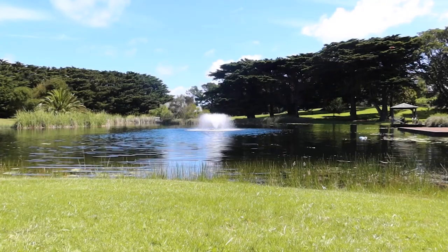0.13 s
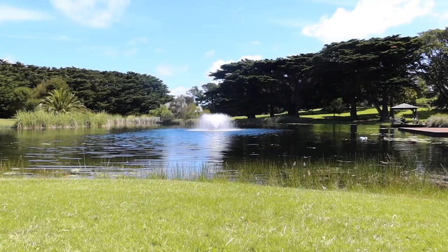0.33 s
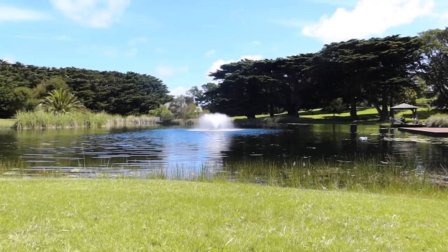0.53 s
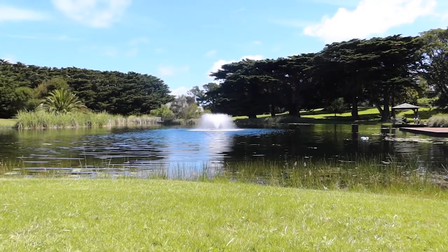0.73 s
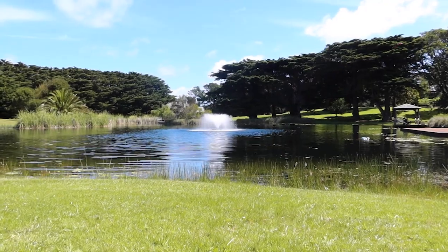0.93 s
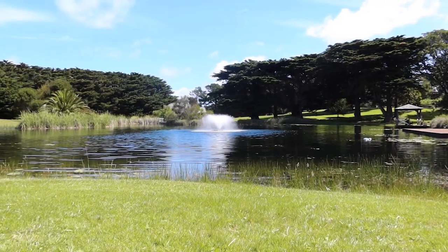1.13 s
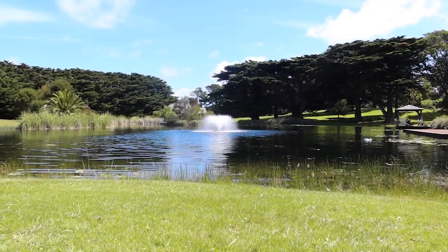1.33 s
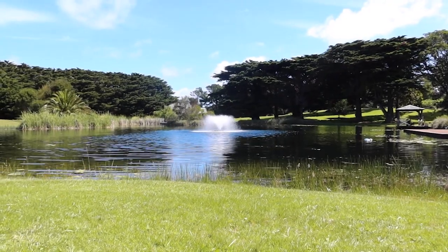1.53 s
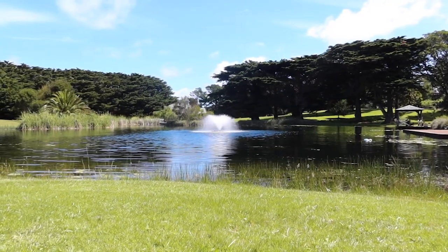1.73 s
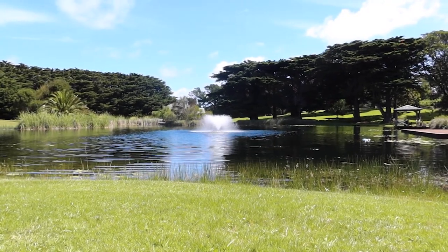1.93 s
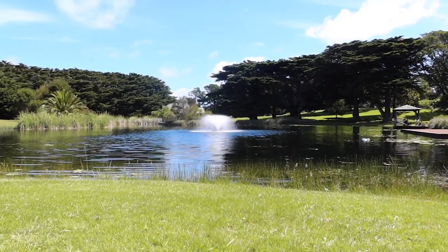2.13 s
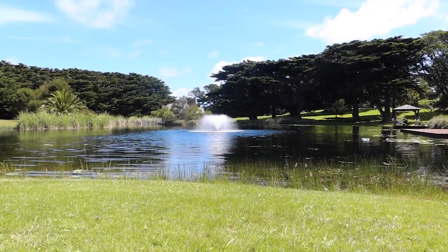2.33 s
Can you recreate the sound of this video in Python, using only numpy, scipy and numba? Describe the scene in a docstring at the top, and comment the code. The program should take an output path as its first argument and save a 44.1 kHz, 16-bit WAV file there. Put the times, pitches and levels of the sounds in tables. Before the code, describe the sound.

A fountain splashes steadily into a pond, with a faint motor hum underneath.

```python
"""Fountain in a park pond

Heard from the bank, the spray falls back as thousands of drop impacts and tiny ringing bubbles a second,
with a few heavier plops and a fine hiss of mist on top. A motor, probably the pump, hums underneath.
A light breeze buffets the mono microphone, mostly in the first half second."""
import sys
import numpy as np
from scipy import signal
from scipy.fft import rfft, irfft, next_fast_len
from scipy.io import wavfile
from numba import njit

SR = 44100
rng = np.random.default_rng(int(sys.argv[2]) if len(sys.argv) > 2 else 0)


def materialize(psi):
    """Save the field psi as 16-bit PCM at rate SR to the path in sys.argv[1].

    A 1-D psi becomes a single channel; in a 2-D psi each row is a channel.
    """
    bounded = np.clip(np.atleast_2d(psi).T, -1, 1)
    quanta = np.round(bounded * 32767).astype(np.int16)
    wavfile.write(sys.argv[1], SR, quanta)


N = 108927

# tone colour of the falling water (frequency [Hz], gain [dB])
SPLASH_EQ = [(210, -34.5), (350, -8), (423, -10), (581, -6), (714, -8.5), (936, -5), (1110, -7),
             (1390, -1.5), (1580, -0.5), (2070, -4.5), (2380, -9), (2790, -7), (3600, -12), (4020, -10),
             (4570, -13.5), (5020, -17.5), (6270, -22.5), (8750, -19), (11100, -32.5), (13900, -36.5),
             (15500, -43)]
# swells in the falling water (time [s], splash gain [dB], mist gain [dB])
WATER_SWELLS = [(.06, 0.5, .3), (.22, -.1, 1.8), (.38, 0.3, 4), (.5, -.5, 1.5), (.95, 0.5, 0.2),
                (1.48, -0.14, -1.5), (1.68, 0.3, -1.1), (1.82, -0.2, -.7), (2.125, 1.25, .2), (2.16, 4, .6),
                (2.195, 0.5, -0.2), (2.46, 1.5, 2.3)]
# ride on one band of the hiss (time [s], gain [dB])
HISS_BAND_RIDE = [(.06, -2.5), (.6, -2.5), (1.1, -0.5), (1.6, 1.5), (2.46, 0)]
# low murmur of the motor and the open air (frequency [Hz], gain [dB])
MURMUR_EQ = [(20, -39), (35, -35), (55, -13), (100, -9), (170, -1), (230, -1.5), (310, 4.5), (380, -3),
             (480, -15), (900, -53.5)]
# the motor's low, middle and high tones (pitch [Hz])
MOTOR_PITCHES = [198.5, 238.4, 319.1]
# balance of those three tones (gain [dB])
MOTOR_TRIMS = [-0.5, 1, -1]
# fader rides of the three tones, ahead of trim and waver (time [s], level [dB])
LOW_TONE_RIDE = [(.1, -48.5), (.9, -43), (1.4, -50), (1.55, -46), (2.45, -48.5)]
MID_TONE_RIDE = [(0.08, -47.5), (0.29, -35.5), (0.58, -48.5), (0.91, -40), (0.99, -43), (1.08, -39),
                 (1.11, -44.5), (1.41, -47.5), (1.45, -67), (1.53, -36), (1.6, -60), (1.64, -39),
                 (1.77, -58), (1.85, -35.5), (1.93, -46.5), (2.02, -36), (2.25, -42.5), (2.45, -40)]
HIGH_TONE_RIDE = [(0.08, -41), (0.19, -39.5), (0.24, -49), (0.72, -56), (0.73, -57), (0.93, -41.5),
                  (0.96, -56), (1.11, -41.5), (1.5, -51), (1.58, -34.5), (1.68, -55), (2.22, -43),
                  (2.32, -64), (2.45, -42)]
# heavier drops that stand out (time [s], pitch [Hz], gain [dB], decay [cycles])
HEAVY_DROPS = [(.131, 2780, -15, 2), (0.267, 2940, -14, 1.3), (0.3856, 2440, -7, 1.25),
               (.527, 1520, -18.5, 4.9), (1.270, 1020, -15.5, 2), (1.276, 1660, -16, 2.2),
               (1.767, 2730, -22, 5.4), (1.9112, 2560, -9, 1.3), (2.138, 1380, -13.5, 3.1),
               (2.180, 1590, -18, 3.7), (2.406, 2770, -18, 3)]
# puffs of wind on the microphone (centre time [s], half length [s], level [dB])
WIND_PUFFS = [(0.163, 0.031, -36.5), (0.254, 0.041, -34), (0.38, 0.039, -32.5), (0.514, 0.036, -35.5),
              (.875, 0.025, -51), (1.59, 0.042, -47.5)]
# tone colour of the puffs (frequency [Hz], gain [dB])
WIND_EQ = [(20, -18), (45, 0.5), (90, 5.5), (150, 3.5), (230, -1), (500, -42)]


def undb(db):
    """Decibels to gain."""
    return 10 ** (np.asarray(db) / 20)


def level(x, db):
    """Set the rms level."""
    return x * undb(db) / np.sqrt(np.mean(x ** 2))


def colour(x, points, low_hz=0):
    """Minimum-phase EQ through (Hz, dB) points, with a steep low cut under low_hz."""
    size = next_fast_len(2 * N)
    hz = np.maximum(np.fft.rfftfreq(size, 1 / SR), 1)
    point_hz, point_db = np.array(points, float).T
    gain = undb(np.interp(np.log(hz), np.log(point_hz), point_db))
    gain /= np.hypot(1, (low_hz / hz) ** 4)
    cepstrum = irfft(np.log(gain + 1e-6), size)
    cepstrum[1:size // 2] *= 2  # folded forward, so nothing rings ahead of a hit
    cepstrum[size // 2 + 1:] = 0
    return irfft(rfft(x, size) * np.exp(rfft(cepstrum)), size)[:N]


def wander(per_s):
    """Smooth random modulation with about per_s turns a second and an rms of 1."""
    hz = np.fft.rfftfreq(N, 1 / SR)
    smoothing = np.exp(-(2 * hz / per_s) ** 2) * (hz > 0)
    return level(irfft(rfft(rng.standard_normal(N)) * smoothing, N), 0)


def drop_hits(per_s, spread_db):
    """Clicks of drops landing at random moments: many small, few large."""
    lands = rng.random(N) < per_s / SR
    size = np.minimum(rng.exponential(size=N), 5)
    return lands * undb(spread_db * size) * rng.choice([-1, 1], N)


@njit
def ring(hits, hz, cycles, rise):
    """Each hit starts a damped sine whose pitch rises as the bubble nears the surface."""
    out = np.zeros(len(hits))
    for i in range(len(hits)):
        if hits[i] != 0:
            decay_samples = cycles[i] * SR / hz[i]
            for j in range(min(int(5 * decay_samples), len(hits) - i)):
                age = j / decay_samples
                phase = 2 * np.pi * cycles[i] * age * (1 + rise * age / 2)
                out[i + j] += hits[i] * np.exp(-age) * np.sin(phase)
    return out


def bubbles(per_s, spread_db, low_hz, high_hz, typical_cycles):
    """Bubbles ring at random pitches; the higher and shorter ones are struck harder."""
    hz = low_hz * (high_hz / low_hz) ** rng.random(N)
    cycles = typical_cycles * 2 ** rng.uniform(-1.15, 1, N)
    hits = drop_hits(per_s, spread_db) * hz / np.sqrt(cycles)
    return colour(ring(hits, hz, cycles, rise=0.04), SPLASH_EQ)


def spray(t, mist_above_hz=6500):
    """Sharp drop impacts, a fizz of small bubbles and a patter of larger ones that ring longer."""
    impacts = colour(drop_hits(per_s=9000, spread_db=1.5), SPLASH_EQ, low_hz=335)
    fizz = bubbles(per_s=2600, spread_db=3.5, low_hz=702, high_hz=5080, typical_cycles=3.3)
    patter = bubbles(per_s=170, spread_db=2, low_hz=1257, high_hz=2324, typical_cycles=9.3)
    water = level(impacts, -31) + level(fizz, -36) + level(patter, -39)
    high_pass = signal.butter(4, mist_above_hz, "high", fs=SR, output="sos")
    mist = signal.sosfiltfilt(high_pass, water)
    splash = water - mist
    times, splash_db, mist_db = np.array(WATER_SWELLS).T
    surge_db = 0.45 * wander(per_s=78)  # the water comes down in uneven sheets
    shimmer_db = 2 + 0.5 * wander(per_s=15)  # the mist is lifted a little and flickers
    splash *= undb(np.interp(t, times, splash_db) + surge_db)
    mist *= undb(np.interp(t, times, mist_db) + shimmer_db)
    return splash + mist


def hiss_hollow(water, t, band_hz=(5900, 7200)):
    """One band of the hiss starts scooped out and slowly fills in."""
    band = signal.sosfiltfilt(signal.butter(2, band_hz, "band", fs=SR, output="sos"), water)
    gain = undb(np.interp(t, *np.array(HISS_BAND_RIDE).T))
    return water + band * (gain - 1)


def motor(t, pitch_drift=0.01, waver_db=1.9, waver_per_s=24.7):
    """The motor hums in three tones that waver in pitch and level, over a bed of low murmur."""
    out = level(colour(rng.standard_normal(N), MURMUR_EQ), -42)
    rides = (LOW_TONE_RIDE, MID_TONE_RIDE, HIGH_TONE_RIDE)
    for hz, trim_db, ride in zip(MOTOR_PITCHES, MOTOR_TRIMS, rides):
        drifting_hz = hz * (1 + pitch_drift * wander(waver_per_s))
        tone = np.sin(2 * np.pi * np.cumsum(drifting_hz) / SR)
        ride_db = np.interp(t, *np.array(ride).T) + waver_db * wander(waver_per_s)
        out += level(tone, trim_db - 1) * undb(ride_db)
    return out


def plops(t, attack_cycles=0.35):
    """Heavier drops hit the pond, each ringing for just a few cycles."""
    out = np.zeros(N)
    for start, hz, db, decay_cycles in HEAVY_DROPS:
        cycles = np.maximum(t - start, 0) * hz
        envelope = (1 - np.exp(-cycles / attack_cycles)) * np.exp(-cycles / decay_cycles)
        out += undb(db) * envelope * np.sin(2 * np.pi * cycles)
    return out


def breeze(t):
    """Puffs of air push on the microphone as soft, low thumps."""
    puffs = sum(undb(db) * np.exp(-((t - centre) / half) ** 2) for centre, half, db in WIND_PUFFS)
    return puffs * level(colour(rng.standard_normal(N), WIND_EQ), 0)


def scene():
    """Water, motor and breeze meet at one microphone, the same in both ears."""
    t = np.arange(N) / SR
    mono = hiss_hollow(spray(t), t) + motor(t) + plops(t) + breeze(t)
    mono *= t >= 0.058  # hard cut in
    return np.array([mono, mono])


def record(dry, top_hz=15700):
    """A steep low-pass shaves off the very top of the mix."""
    return signal.sosfilt(signal.ellip(12, 0.1, 80, top_hz, fs=SR, output="sos"), dry)


dry = scene()
out = record(dry)
materialize(out)
```